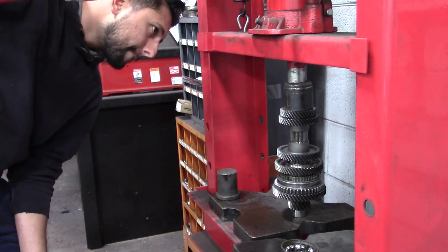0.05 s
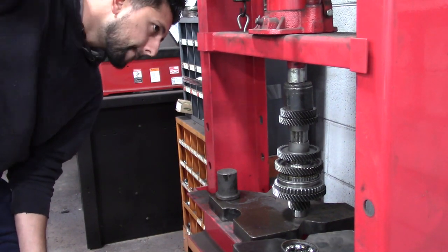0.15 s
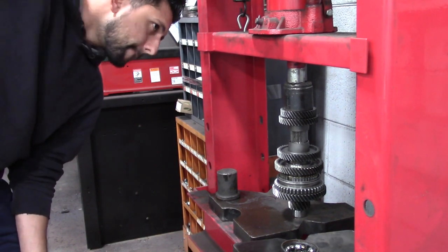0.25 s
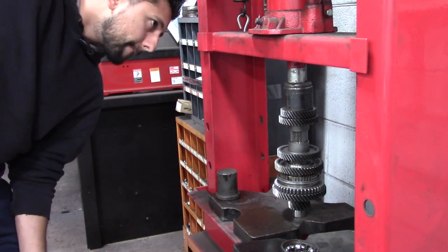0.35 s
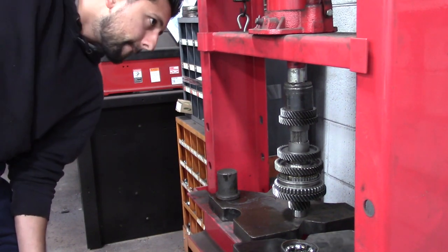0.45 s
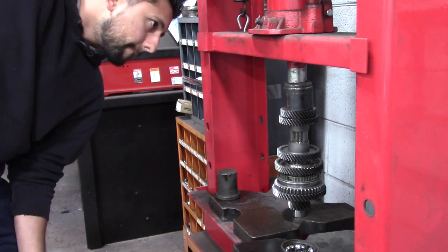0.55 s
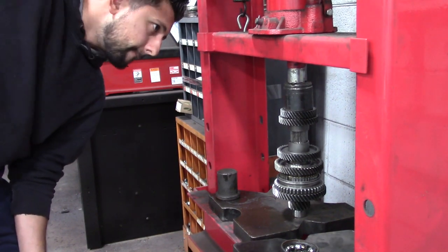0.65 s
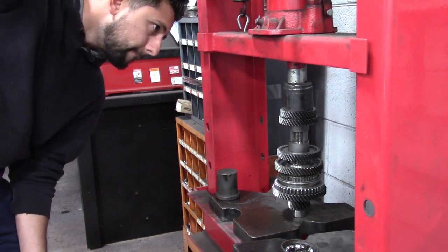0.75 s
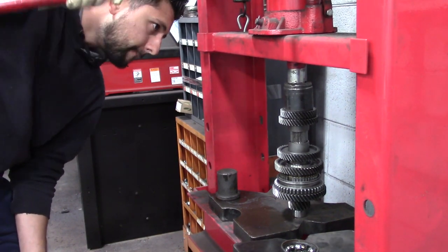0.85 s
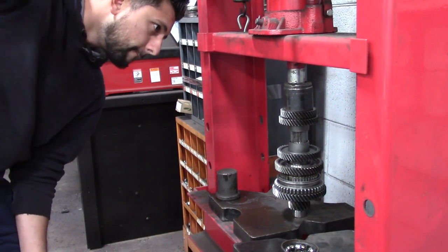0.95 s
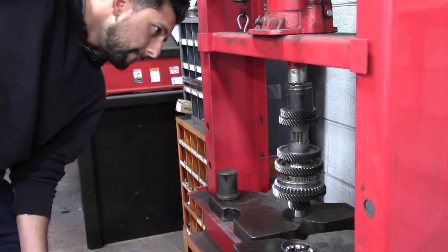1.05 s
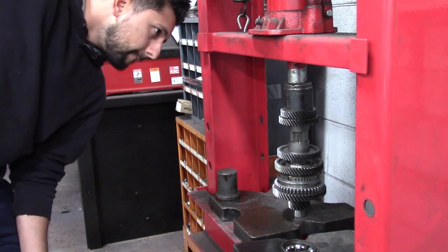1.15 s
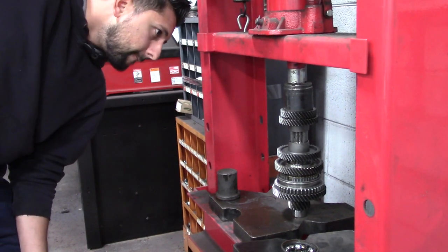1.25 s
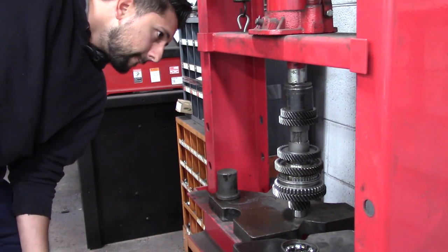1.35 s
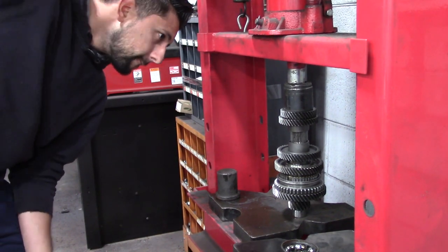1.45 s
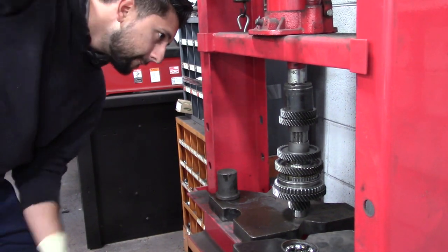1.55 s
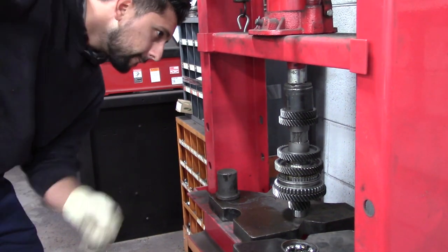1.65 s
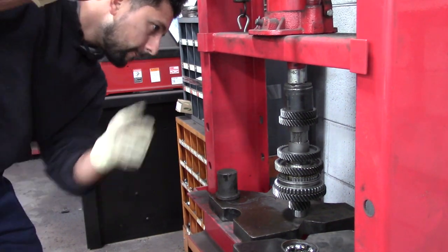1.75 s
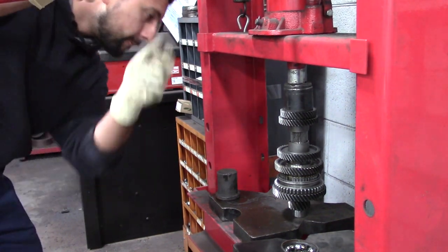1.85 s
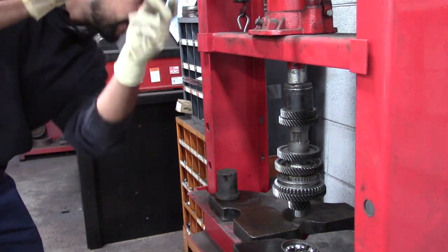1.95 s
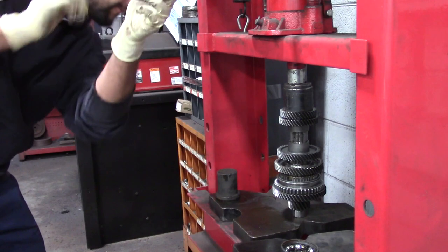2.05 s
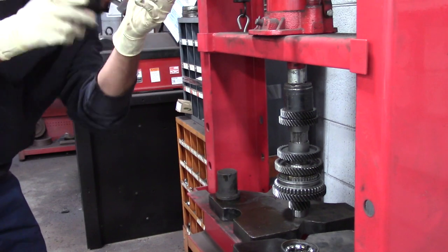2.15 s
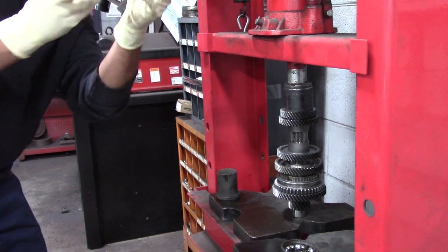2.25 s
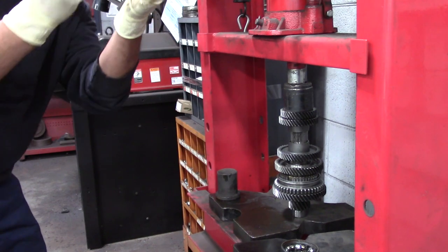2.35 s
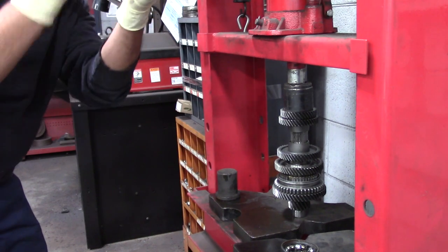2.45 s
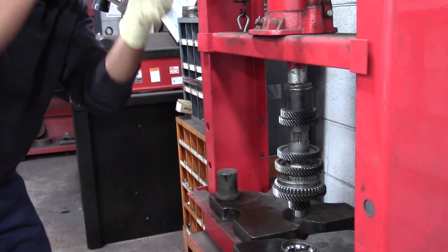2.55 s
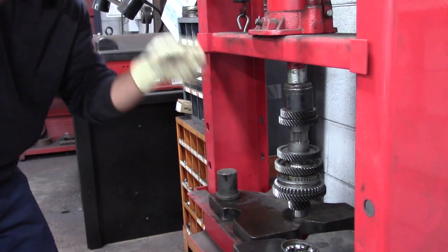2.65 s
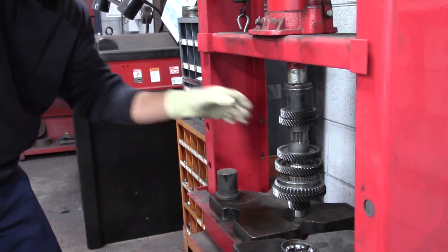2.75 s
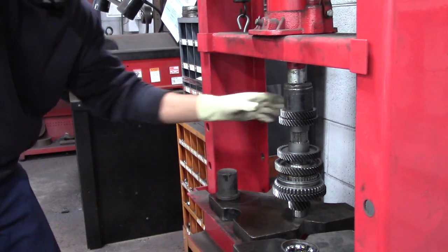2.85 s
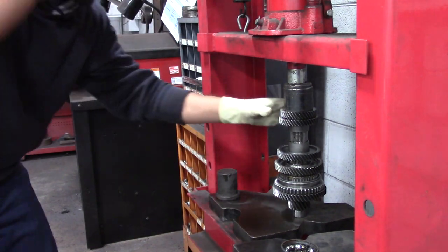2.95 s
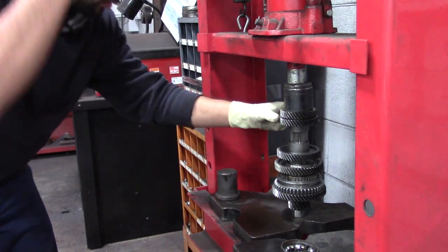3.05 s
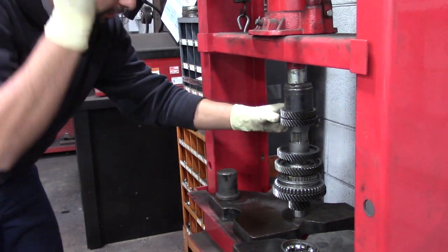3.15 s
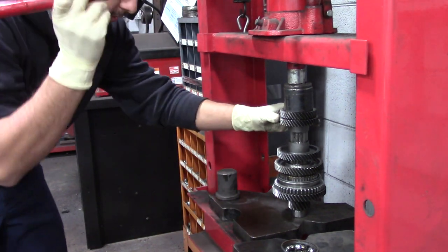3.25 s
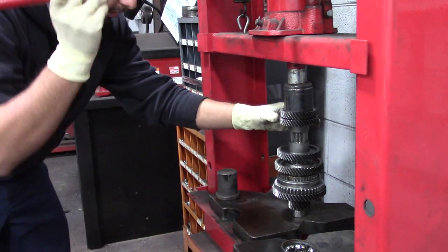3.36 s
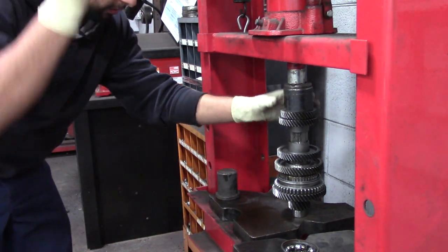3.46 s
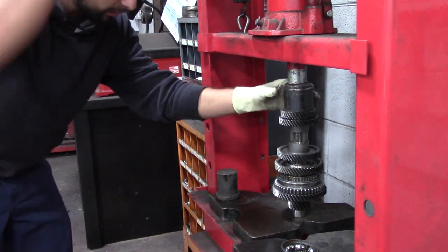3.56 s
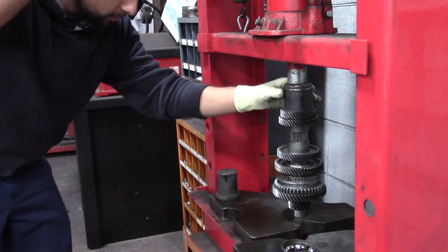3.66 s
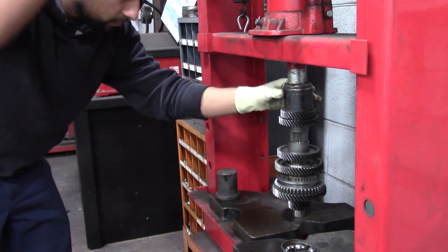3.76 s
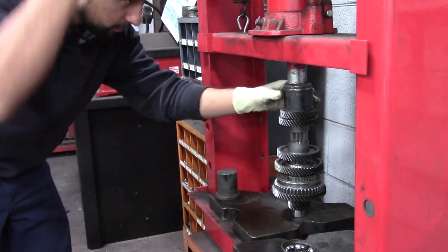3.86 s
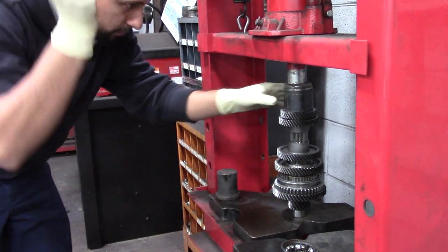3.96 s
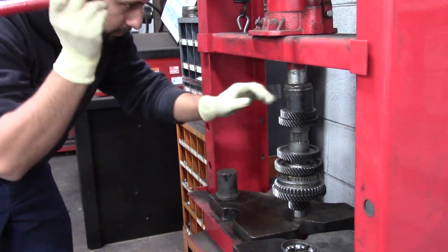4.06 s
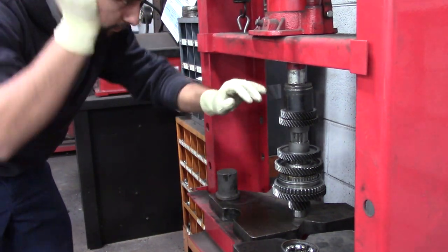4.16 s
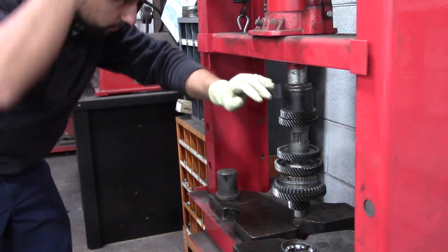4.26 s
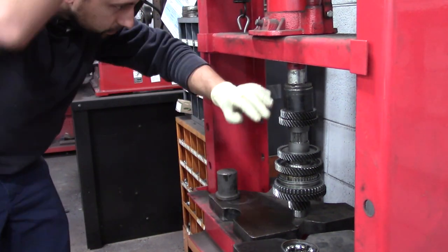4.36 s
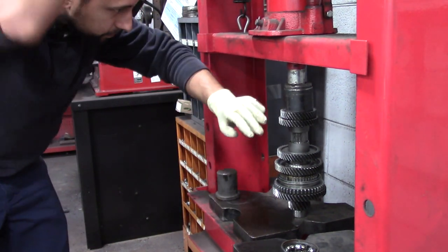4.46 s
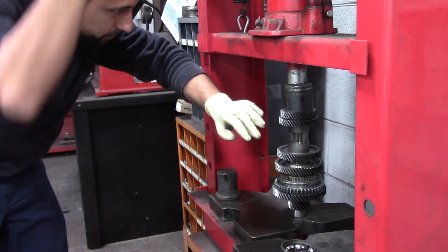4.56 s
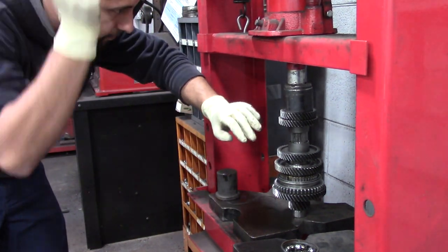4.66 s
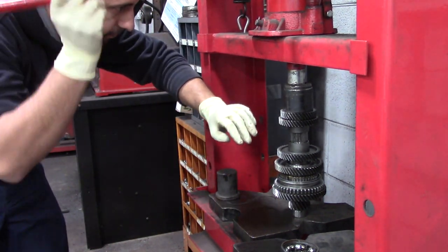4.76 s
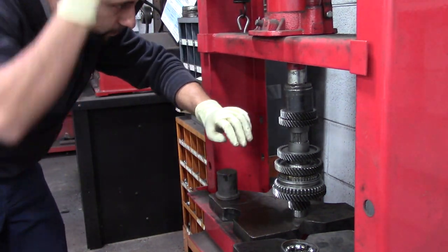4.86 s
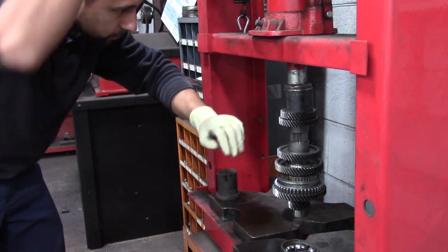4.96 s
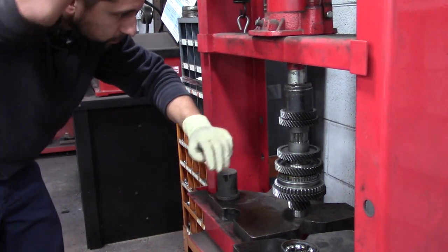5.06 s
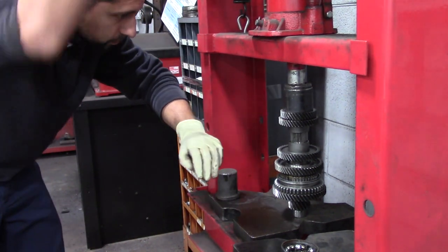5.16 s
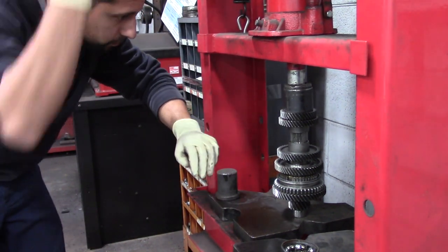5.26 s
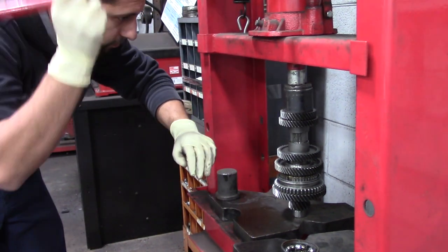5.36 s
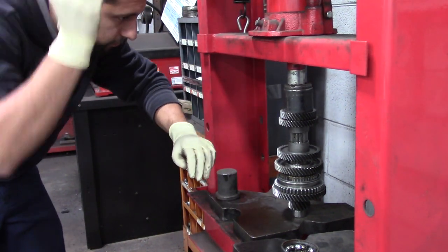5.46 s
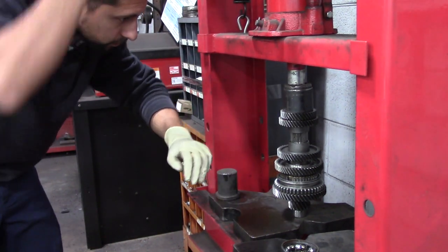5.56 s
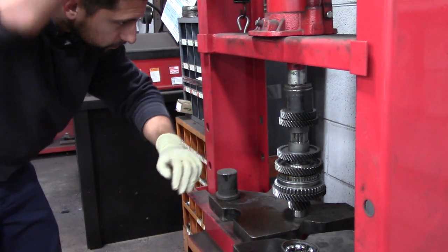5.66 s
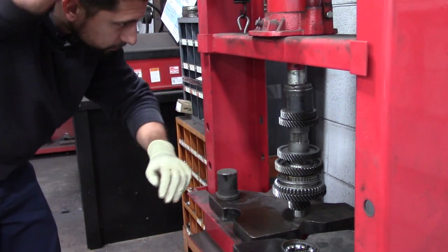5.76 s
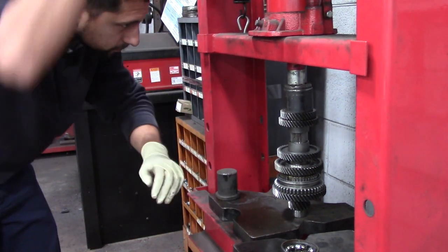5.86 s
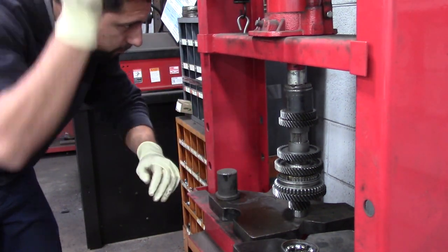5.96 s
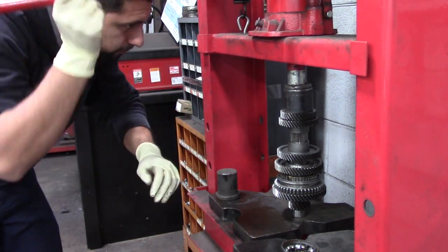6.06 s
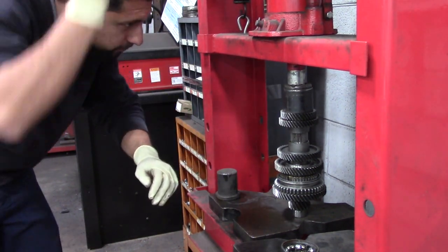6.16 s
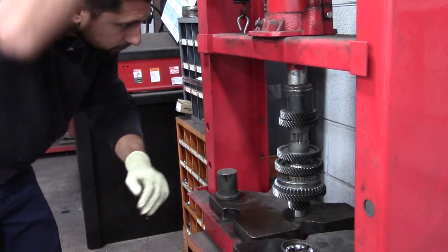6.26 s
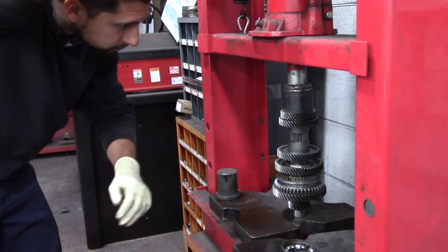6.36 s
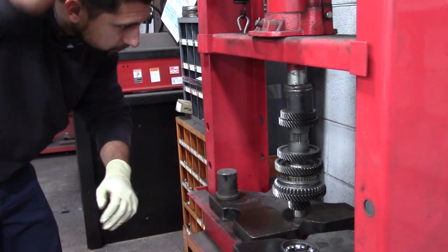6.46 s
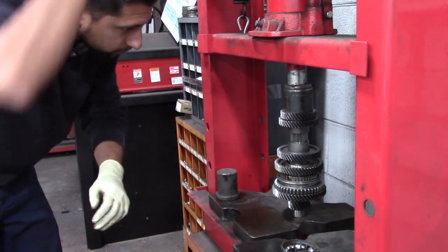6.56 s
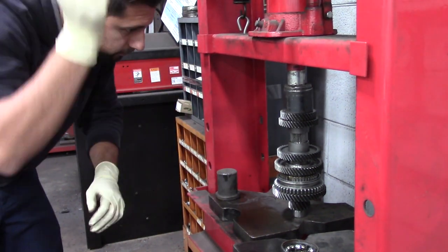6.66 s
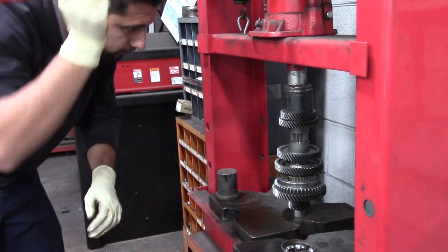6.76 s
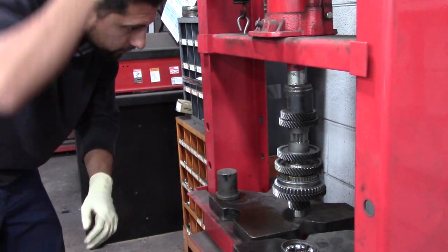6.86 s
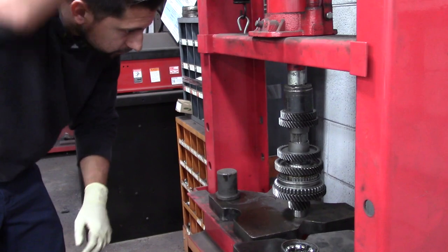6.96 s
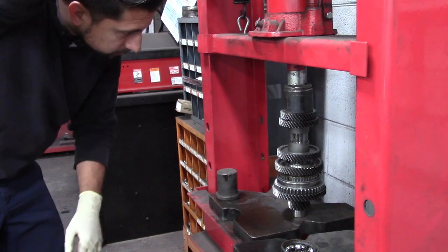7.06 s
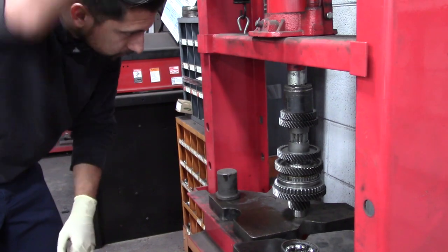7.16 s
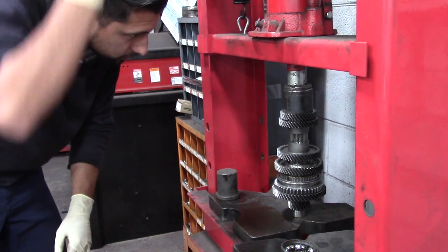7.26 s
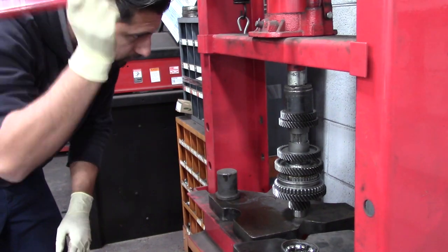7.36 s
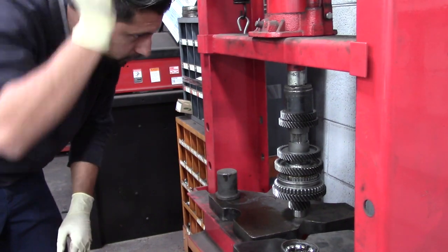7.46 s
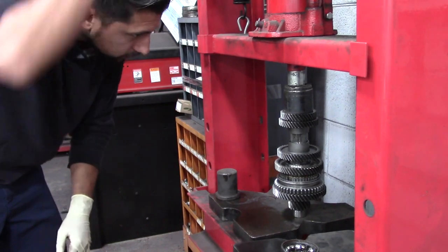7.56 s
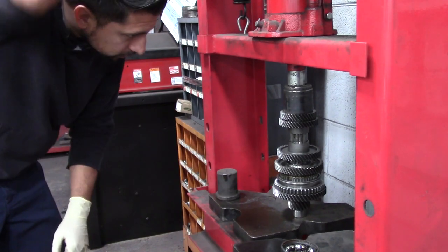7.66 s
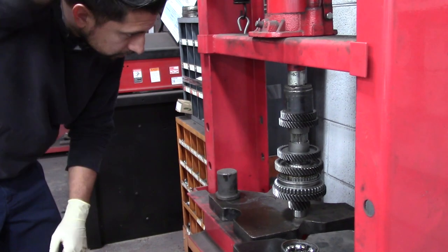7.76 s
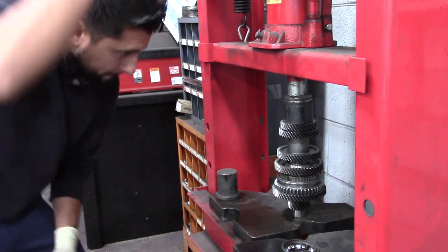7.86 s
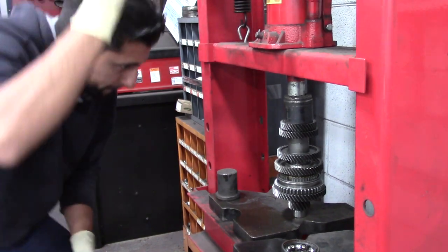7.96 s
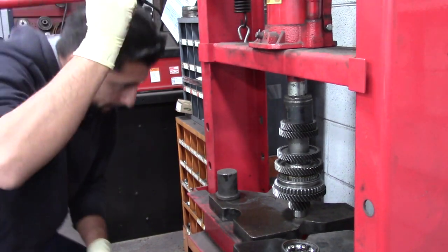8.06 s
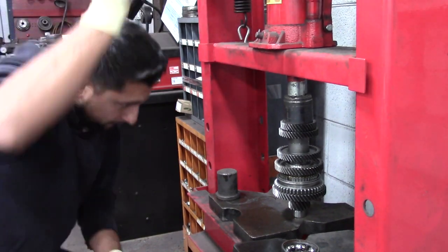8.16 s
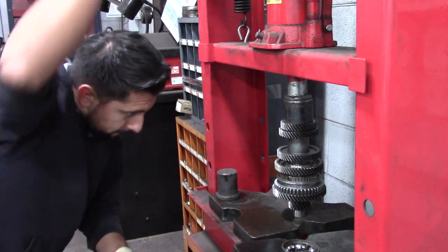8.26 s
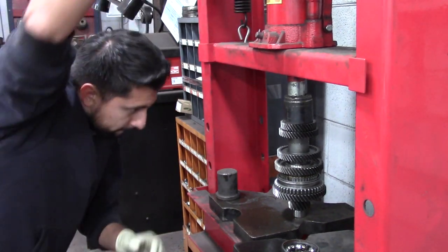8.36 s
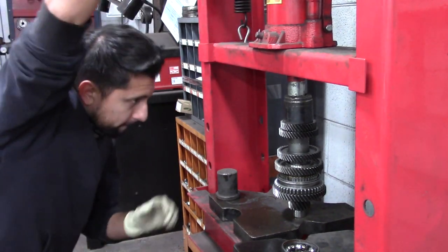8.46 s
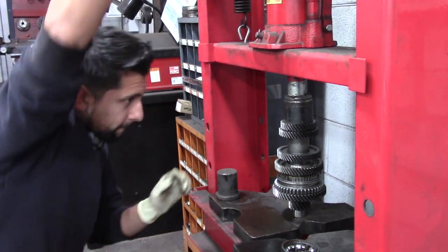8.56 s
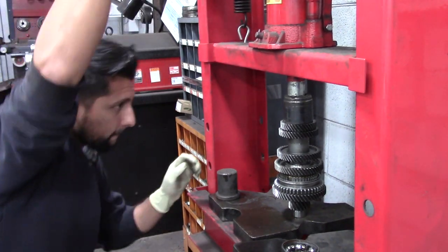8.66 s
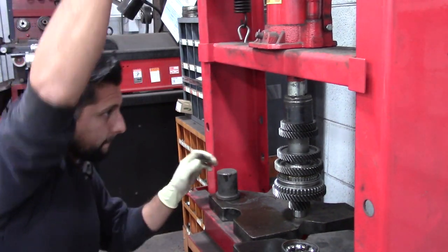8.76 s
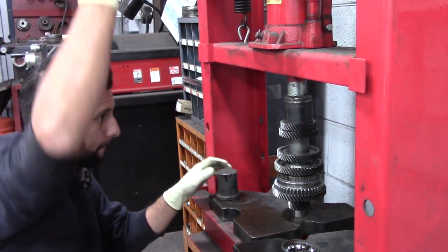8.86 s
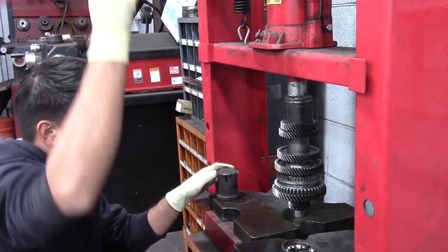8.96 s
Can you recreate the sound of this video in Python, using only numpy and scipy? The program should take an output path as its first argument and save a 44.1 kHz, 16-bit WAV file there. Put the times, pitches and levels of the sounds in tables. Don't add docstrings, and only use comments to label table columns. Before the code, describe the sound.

Repeated lever strokes on a hydraulic press: bright ratcheting clacks, short rasping rings, a gear slipping with a hollow steel boom, close up.

```python
import sys
import numpy as np
from scipy import signal
from scipy.fft import rfft, irfft, next_fast_len
from scipy.io import wavfile
from scipy.ndimage import uniform_filter1d

SR = 44100
rng = np.random.default_rng(int(sys.argv[2]) if len(sys.argv) > 2 else 0)


def invert_db(level):
    return 10 ** (np.asarray(level, dtype=float) / 20)


def dump(signal):
    limited = np.clip(np.atleast_2d(signal).T, -1, 1)
    pcm = np.round(limited * 32767).astype(np.int16)
    wavfile.write(sys.argv[1], SR, pcm)


N = 397782


def evened(x):
    return x / np.sqrt(np.mean(x ** 2) + 1e-20)


def read(points, hz):
    f, value = np.transpose(points)
    return np.interp(np.log(hz + 1), np.log(f + 1), value)


def add(mix, start_s, sound):
    part = mix[round(start_s * SR):][:len(sound)]
    part += sound[:len(part)]


def shaped(x, gain_db):
    size = next_fast_len(len(x), True)
    return irfft(rfft(x, size) * invert_db(gain_db(np.fft.rfftfreq(size, 1 / SR))), size)[:len(x)]


def dying_noise(colour, t60, seconds):
    hz, t, z = signal.stft(rng.standard_normal(round(seconds * SR)), SR, nperseg=512)
    z = z * invert_db(read(colour, hz)[:, None] - 60 * t / read(t60, hz)[:, None])
    tail = signal.istft(z, SR, nperseg=512)[1]
    return tail / np.linalg.norm(tail)


def rings(hz, db, t60, t, spread=0., count=1):
    hz, db, t60 = (np.repeat(v, count) for v in (hz, db, t60))
    detune, start = rng.standard_normal(len(hz)), rng.random(len(hz))
    pole = np.exp((2j * np.pi * hz * (1 + spread * detune) - np.log(1000) / t60) / SR)
    swing = np.cumprod(np.broadcast_to(pole[:, None], (len(hz), len(t))), axis=1)
    return ((invert_db(db) * np.exp(2j * np.pi * start)) @ swing).real


# start_s, peak_db [dB]
SLACK_HITS = [(0.542, -15), (1.335, -12), (3.7786, -15), (4.498, -11), (5.149, -13.5), (5.8017, -11),
              (6.467, -9), (7.138, -9), (7.7923, -7.5)]
VALVE_HITS = [(0.5595, -6.5), (1.3656, -5), (3.8053, -1.5), (4.5235, -0.5), (5.1744, -5.5), (5.827, -5),
              (6.4946, -2.5), (7.1635, 0), (7.82, -1)]
SEAT_HITS = [(0.5916, -0.5), (1.3924, -0.5), (3.8322, -0.5), (4.5473, 0), (5.199, 2.5), (5.8499, 3),
             (6.517, 3), (7.183, 2.5), (7.8412, 1)]
# start_s, peak_db [dB]
TICK_HITS = [(0.307, -28), (0.4642, 2.5), (0.831, -11.5), (1.063, -11.5), (2.472, -7), (2.7043, -20.5),
             (3.263, -14), (4.0357, -12), (4.2054, -6), (4.7346, -24), (4.8688, -6.5), (5.3725, -8.5),
             (6.0246, -9.5), (6.0811, -25), (6.7106, -9), (7.3756, -4.5), (8.3938, -22), (8.561, -8)]
# start_s, peak_db [dB]
BALL_HITS = [(0.174, -8), (2.322, -10), (2.405, -30), (5.501, -0.5), (6.046, -24), (6.124, 6.5),
             (6.137, -2.5), (6.1508, 2)]
# start_s, peak_db [dB], pitch_hz [Hz] of the strongest ring
PIN_HITS = [(0.164, -8, 11000), (0.9893, 3.5, 10770), (2.3189, -4.5, 3140), (2.385, -18.5, 3130),
            (2.917, -17, 5640), (2.931, -8.5, 5750), (2.944, -9, 10900), (3.389, -16, 4180),
            (3.4256, -6, 8600), (3.435, -10.5, 6040), (4.133, -23, 5960), (4.1624, -10, 6030),
            (4.1727, -8.5, 10600), (4.804, -10.5, 5230), (4.835, 0, 10660), (5.461, 1, 6000),
            (6.806, 2, 10900), (6.826, -5, 5600), (7.4702, 2.5, 11000), (8.1683, -6.5, 11000),
            (8.1775, -1, 3890), (8.1872, 4, 3890), (8.5866, -11, 6680), (8.61, -22, 13000),
            (8.6186, -7.5, 6020)]
# start_s, peak_db [dB], pitch_hz [Hz] of the strongest ring
LINK_HITS = [(0.1006, -14, 5730), (0.1122, -7, 3060), (0.9687, 3, 3110), (1.926, -30.5, 2530),
             (2.2267, -7, 6130), (2.2542, -27, 4360), (2.2686, -19, 4360), (2.3045, -4.5, 6100),
             (2.9702, -9, 4360), (3.3683, -22, 2560), (3.466, -4, 3105), (4.785, -10.5, 3130),
             (5.449, -20, 5830), (5.527, -5.5, 5580), (6.11, -15, 4360), (6.1811, -1.5, 5750),
             (6.7871, -2, 4300), (7.423, -7, 5600), (7.445, -8, 4380), (7.456, -7, 5630),
             (7.4896, -2, 4390), (8.046, -16, 2740), (8.221, -5.5, 2400), (8.459, -20, 6200),
             (8.4718, -14, 2660), (9.0134, -17.5, 2870)]
# treble_db, ring t60_s, strongest ring's own_db
SLACK, VALVE, SEAT = (-25.5, 0.09, -9), (0, 0.083, 0.5), (-7, 0.067, -6)
TICK, BALL, PIN = (-31, 0.057, -3), (-8, 0.08, -0.91), (-9, 0.099, -2.5)
LINK, JOLT = (-19, 0.091, -6), (-40, 0.094, -3.5)
SLACK_HZ, VALVE_HZ, SEAT_HZ, TICK_HZ, JOLT_HZ = 3930, 13800, 10900, 3018, 4700
JOLT_S, JOLT_DB = 0.011, -4
PLAY_S, PLAY_DB = 0.008, -2.0


def contacts():
    kinds = [(SLACK_HITS, SLACK_HZ, SLACK), (VALVE_HITS, VALVE_HZ, VALVE), (SEAT_HITS, SEAT_HZ, SEAT),
             (TICK_HITS, TICK_HZ, TICK), (BALL_HITS, VALVE_HZ, BALL)]
    rows = [(s, db, hz, *sound) for table, hz, sound in kinds for s, db in table]
    rows += [(*row, *PIN) for row in PIN_HITS]
    rows += [(*row, *LINK) for row in LINK_HITS]
    rows += [(s + JOLT_S, db + JOLT_DB, JOLT_HZ, *JOLT) for s, db, *_ in SLIPS[:-1]]
    rows += [(s + PLAY_S, db + PLAY_DB, TICK_HZ, *SLACK) for s, db in SLACK_HITS]
    return sorted(rows)


# pitch_hz [Hz], width_hz [Hz], level_db [dB]
HANDLE_MODES = [(2225, 38, -8), (2560, 80, -2), (3217, 77, 0.5), (4360, 73, 3), (4500, 150, -25),
                (5750, 61, -3), (6210, 76, -8), (7020, 44, -1), (6900, 75, -38.5), (7820, 130, -4),
                (8650, 59, 6), (10100, 59, -8), (10100, 29, -21.5), (11000, 110, -21), (10460, 33, -19),
                (11800, 71, -25), (13700, 110, -42.5), (13340, 39, 2.5), (14230, 33, -2), (13720, 28, 5)]
# freq_hz [Hz], density_db [dB per Hz]
SNAP_COLOUR = [(710, -30), (2200, -6.5), (4140, -1), (4720, -8.5), (5820, 2.5), (7570, -7), (11000, -0.5),
               (12400, -5), (14300, -14), (16500, -32)]


def handle():
    out, t = np.zeros(N), np.arange(round(.12 * SR)) / SR
    mode_hz, width, mode_db = np.transpose(HANDLE_MODES)
    hits = contacts()
    for (s, peak_db, hz, treble_db, t60, own_db), after in zip(hits, hits[1:] + [(N,)]):
        tilt = lambda f: (treble_db + 6.0) * np.clip(np.log2((f + 1) / 3800.0) / 1.52, 0, 1)
        t60 = np.clip(t60, .02, .25)
        spot_db = 4.5 * rng.standard_normal(len(mode_hz))
        level_db = mode_db + tilt(mode_hz) + spot_db
        modes = rings(mode_hz, level_db, .65 * t60 + 0 * width, t, .004, count=2)
        own = rings(np.array([hz]), np.array([own_db - 5.]), np.array([.7 * t60]), t, .005, count=3)
        bounce = np.linspace(.45, .1, 500) * rng.standard_normal(500)
        bounces = np.r_[1, bounce * (rng.random(500) < .012)]
        ring = signal.fftconvolve(invert_db(-0.5) * modes / abs(modes).max() + own, bounces)[:len(t)]
        snap = evened(shaped(rng.standard_normal(len(t)), lambda f: read(SNAP_COLOUR, f) + tilt(f)))
        snap *= invert_db(-5.5 - 60 * t / (1.5 * t60)) + invert_db(-4.0 - 60 * t / 0.018)
        choke = invert_db(-60 * np.maximum(t - (after[0] - s), 0) / 0.022)
        onset = np.minimum(t / (0.02 * t60), 1)
        add(out, s, invert_db(peak_db - 9.0) * (ring + snap) * onset * choke)
    return out


# pitch_hz [Hz], level_db [dB]
FRAME_MODES = [(160, -44), (236, -25.5), (282, -38), (345, -47), (405, -40), (458, -27), (520, -31.5),
               (600, -32.5), (655, -23.5), (712, -23.5), (755, -32.5), (835, -28), (869, -29), (951, -29),
               (1078, -31.5), (1237, -33.5), (1404, -34.5), (1520, -68), (1630, -42.5), (1850, -44.5),
               (1920, -49), (2090, -45.5), (2350, -74), (3053, -46.5)]
# freq_hz [Hz], density_db [dB per Hz]
BOOM_COLOUR = [(35, -75), (60, -40.5), (225, -7), (404, -9.5), (655, -0.5), (791, -13.5), (860, -10),
               (1650, -21.5), (1910, -20.5), (2510, -30), (4900, -42.5), (5790, -55), (9000, -70),
               (11700, -92), (19800, -120)]
# freq_hz [Hz], t60_s [s]
BOOM_DECAY = [(60, 1), (200, 0.77), (600, 0.97), (1500, 0.87), (3000, 0.77), (7000, 0.58)]


def struck_frame(force, bright, ring):
    hz, db = np.transpose(FRAME_MODES)
    t = np.arange(round(1.2 * SR)) / SR
    t60 = [(f, d * ring) for f, d in BOOM_DECAY]
    modes = rings(hz, db + rng.standard_normal(len(hz)), 1.48 * read(t60, hz), t, spread=0.01217, count=3)
    boom = dying_noise(BOOM_COLOUR, t60, len(t) / SR)[:len(t)]
    boom = boom * (1 + 0.54 * np.exp(-t / 0.019))
    body = invert_db(-3.5) * modes / np.linalg.norm(modes) + boom

    def colour(f):
        tilt_db = bright * np.log2(np.clip(f, 150, 6000) / 650)
        return tilt_db + 36.0 * np.minimum(np.log2((f + 1) / 121.0), 0)

    return signal.fftconvolve(shaped(force, colour), body * np.minimum(t / 0.0023, 1))


# start_s, blow_db, slip length_s, shudder_db under the blow, bright [dB
SLIPS = [(0.63, -10, 0.13, -20, -1), (1.429, -12.5, 0.096, -2, -1.5), (3.024, -8, 0.094, -1.5, 0.5),
         (3.868, -6.5, 0.093, -5.5, 0.5), (4.584, -10, 0.162, -5.5, 0), (5.232, -5.5, 0.12, -7.5, 1),
         (5.882, -8, 0.099, -4.5, 1), (6.549, -9, 0.125, -4.5, 1.5), (7.22, -8.5, 0.11, -8, 1.5),
         (7.875, -9.5, 0.065, -6, -0.5), (8.79, -11.5, 0.107, -5, 0)]
# start_s, blow_db, bright [dB per octave]
FRAME_KNOCKS = [(0.828, -19, 12), (0.97, -9, 3), (2.225, -25.5, 13.5), (2.99, -2.5, 3.5), (3.47, -19, -3),
                (4.072, -21, 8.5), (4.2, -23, 9), (4.869, -27, 11), (5.372, -25.5, 15.5), (5.504, -19, 5),
                (6.023, -6.5, 5.5), (6.161, -9, 0), (6.811, -20, 12), (7.469, -12, 4.5), (8.201, -7.5, 5.5),
                (8.467, -21, 8), (8.641, -10, 6)]
# pitch_hz [Hz], level_db [dB], t60_s [s]
RAM_PINGS = [(4740, -31, 0.16), (6800, -25.5, 0.072), (13300, -45.5, 0.055)]
SEAT_KNOCK_S, SEAT_KNOCK_DB, SEAT_KNOCK_BRIGHT = 0.0037, -4.5, 4.6
KNOCK_S = 0.0052


def frame():
    out, knocks, u = np.zeros(N), np.zeros(N), np.arange(round(.3 * SR)) / SR
    ping_hz, ping_db, ping_t60 = np.transpose(RAM_PINGS)
    ping_spread = np.repeat([.02, .002, .002], 2)
    for s, blow_db, length, shudder_db, bright in SLIPS:
        stick_db = 4.6 * rng.standard_normal(len(u))
        slide = np.clip((length - u) / 0.0083, 0, 1) * invert_db(shudder_db - 18.0 + stick_db)
        force = rng.standard_normal(len(u)) * slide + invert_db(20.0) * (u == u[88])
        add(out, s - u[88], invert_db(blow_db + 16.0) * struck_frame(force, bright, 1))
        if s < SLIPS[-1][0]:
            ping = rings(ping_hz, ping_db, ping_t60, u, ping_spread, count=2)
            add(out, s + .015, invert_db(blow_db + 6.5) * ping)
    seats = [(s + SEAT_KNOCK_S, SEAT_KNOCK_DB + 0.22 * db, SEAT_KNOCK_BRIGHT) for s, db in SEAT_HITS]
    for s, blow_db, bright in FRAME_KNOCKS + seats:
        force = rng.standard_normal(len(u)) * u / KNOCK_S * np.exp(1 - u / KNOCK_S)
        force = shaped(force, lambda f: bright * np.log2(np.clip(f, 150, 2500) / 650))
        add(knocks, s, invert_db(blow_db - 4.5) * force)
    out += struck_frame(knocks, 0, 0.65)[:N]
    add(out, 0, invert_db(12.5) * struck_frame(1. * (u == 0), -3.2, 1))
    return out


# start_s, peak_db [dB], damping factor (longer ring when higher)
PLATE_STRIKES = [
    (0.0, -28.5, 3.5),
    (0.4563, -7.5, 0.44),
    (8.659, -44, 0.7),
]
# pitch_hz [Hz], width_hz [Hz], level_db [dB]
PLATE_MODES = [(471, 36, -5.5), (680, 15, -2), (900, 26, -26), (1025, 25, -4.5), (1263, 38, -1.5),
               (1533, 65, -1), (2340, 44, -10.5), (2600, 26, -12.5), (2626, 34, -7), (3130, 19, -37),
               (3260, 48, -19), (3600, 27, -37), (3760, 15, -21), (3890, 37, -19), (4100, 26, -37),
               (4490, 110, -22.5), (4940, 26, -31), (5750, 210, -43)]


def plate():
    out, t = np.zeros(N), np.arange(SR // 2) / SR
    hz, width, db = np.transpose(PLATE_MODES)
    for s, peak_db, slower in PLATE_STRIKES:
        ring = rings(hz, db + 4.7 * np.log2(hz / 1000), slower * 1.2 + 0 * hz, t, spread=0.033, count=9)
        rattle = shaped(rng.standard_normal(len(t)), lambda f: -10. * abs(np.log2((f + 20) / 1150.0)))
        rattle = invert_db(-12.5 - 60 * t / (.5 * slower)) * evened(rattle)
        settle = invert_db(-8. * np.clip((t - .08) / .01, 0, 1))
        add(out, s, invert_db(peak_db + 9.0) * settle * (ring / abs(ring).max() + rattle))
    return out


# start_s, level_db [dB]
PAWL_SONGS = [(2.269, -22.5), (4.784, -25.5), (6.112, -20.5), (7.423, -19.5)]
PAWL_HZ = np.array([3200., 4370., 5680.])


def pawl():
    out, t = np.zeros(N), np.arange(round(0.044 * SR)) / SR
    for s, db in PAWL_SONGS:
        tones = rings(PAWL_HZ, db + 0 * PAWL_HZ, 0.49 + 0 * PAWL_HZ, t)
        add(out, s, tones * np.sqrt(1 - t / t[-1]))
    return out


def garage(x):
    colour = [(500, 10), (3000, 0.0), (8000, -14), (16000, -30)]  # Hz, dB
    t60 = [(1000, 0.96), (4000, 0.43), (12000, 0.68)]  # Hz, s
    tail = dying_noise(colour, t60, 0.67)
    return signal.fftconvolve(x, np.r_[np.zeros(200), tail])[:N]


# freq_hz [Hz], density_db [dB per Hz]
AIR_COLOUR = [(12, -57), (20, -28), (60, -24.5), (124, -12.5), (155, -5.5), (237, -10.5), (273, -6.5),
              (506, -12), (771, -5.5), (839, -9), (1560, -20.5), (5510, -33), (9400, -28.5), (15100, -42.5),
              (16500, -64)]
# start_s, pitch_hz [Hz], level_db [dB]
SPRING_HUM = [
    (2.7, 265, -66),
    (2.8, 278.4, -38.5),
    (3.0, 276.5, -39),
]


def air():
    s, hz, db = np.transpose(SPRING_HUM)
    t = np.arange(N) / SR
    phase = 2 * np.pi * np.cumsum(np.interp(t, s, hz)) / SR
    hum = invert_db(np.interp(t, s, db, -90, -90)) * np.sqrt(2) * np.sin(phase)
    noise = evened(shaped(rng.standard_normal(N), lambda f: read(AIR_COLOUR, f)))
    return invert_db(-32.5) * noise + hum


# freq_hz [Hz], side minus mid level_db [dB]
SIDE_LEVEL = [(60, -25.5), (130, -57), (290, -23.5), (640, -19.5), (1410, -12.5), (3100, -10), (6820, -6.5),
              (15000, -5)]
# freq_hz [Hz], left minus right level_db [dB]
LEAN = [(60, 0.0), (180, 0.0), (550, 0.0), (1650, 0.0), (4970, -0.5), (15000, -0.5)]


def scene():
    near = handle() + plate()
    mid = near + invert_db(-6.5) * garage(near) + frame() + air() + pawl()
    smear = rng.standard_normal(1500) * np.exp(-np.arange(1500) / 390.0)
    other = signal.oaconvolve(mid, smear / np.linalg.norm(smear))[:N]
    side = shaped(other, lambda f: read(SIDE_LEVEL, f) - 11.5)
    return np.array([shaped(mid, lambda f: way * read(LEAN, f) / 2) + way * side for way in (1, -1)])


def top_cut(x):
    return signal.sosfilt(signal.butter(12, 16630, fs=SR, output="sos"), x)


def record(dry):
    peak_db = 20 * np.log10(abs(dry).max(0) + 1e-9)
    fall = np.arange(N) * 46.0 / SR
    over_db = np.maximum(np.maximum.accumulate(peak_db + fall) - fall, 0)
    held = dry / invert_db(0.41 * uniform_filter1d(over_db, 60))
    held = .97 * held / (1 + (held / .97) ** 4) ** .25

    def band(f):
        low_cut = 5.4 * np.minimum(np.log2((f + 1) / 72.0), 0)
        return low_cut - 80 * np.clip((f - 16450) / 300, 0, 1)

    return top_cut(np.array([shaped(c, band) for c in held]))


dry = scene()
out = record(dry)
dump(out)
```